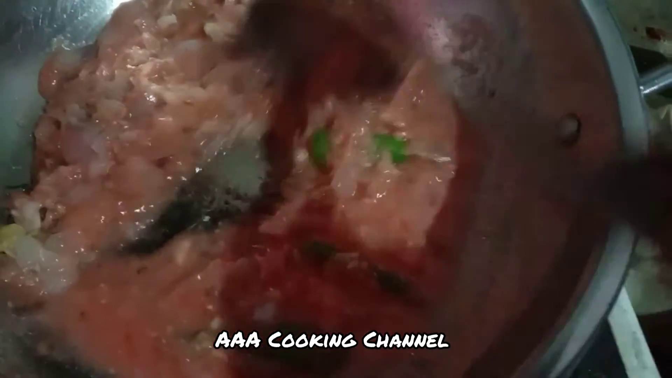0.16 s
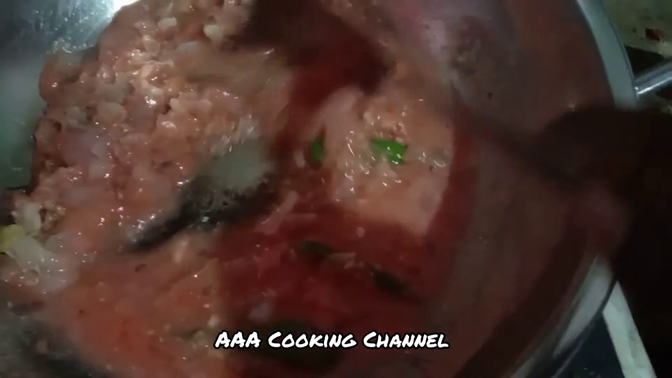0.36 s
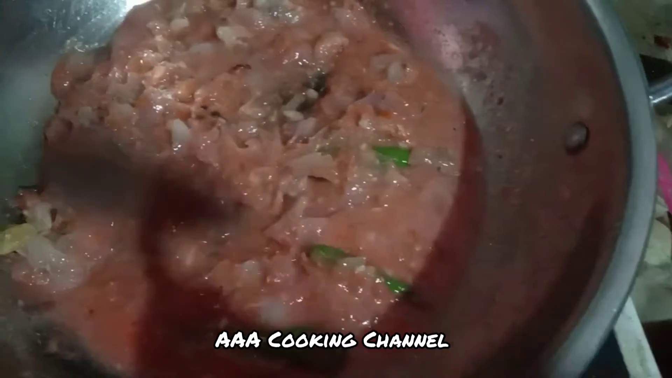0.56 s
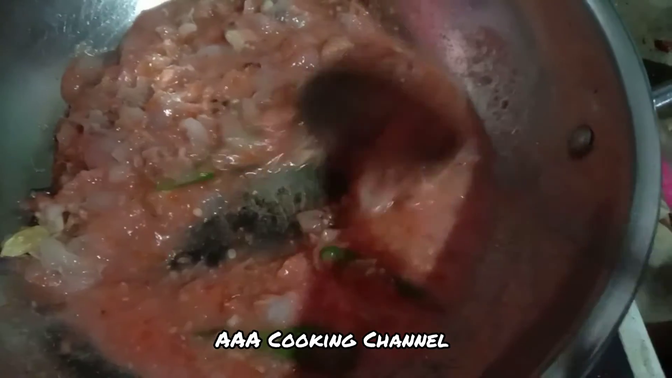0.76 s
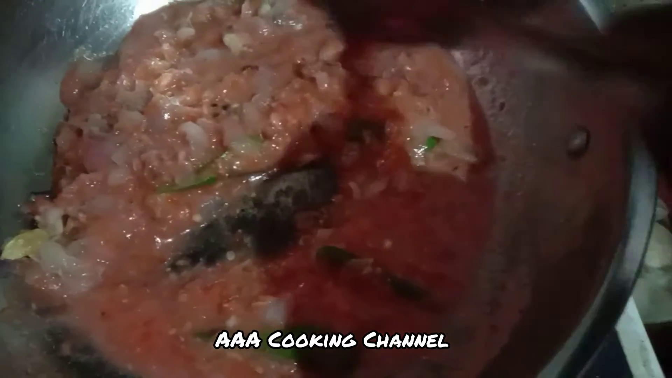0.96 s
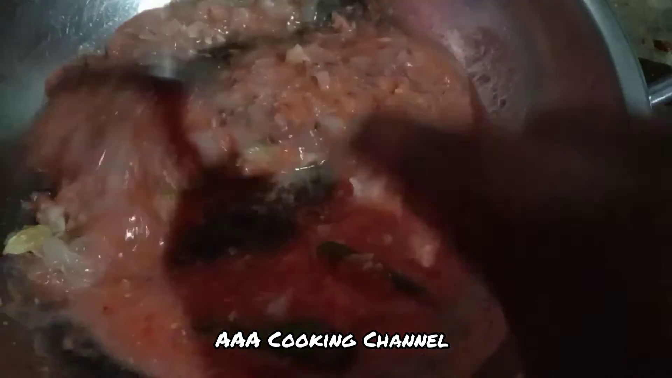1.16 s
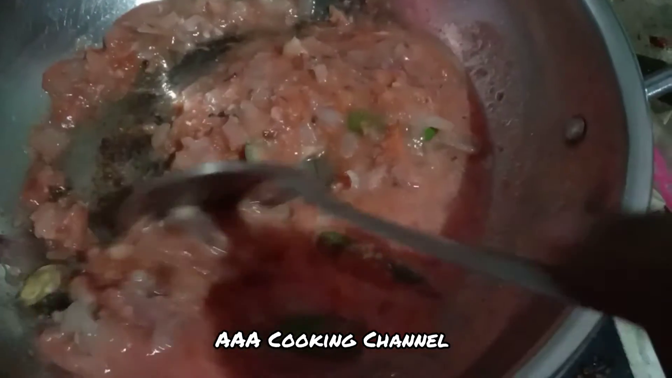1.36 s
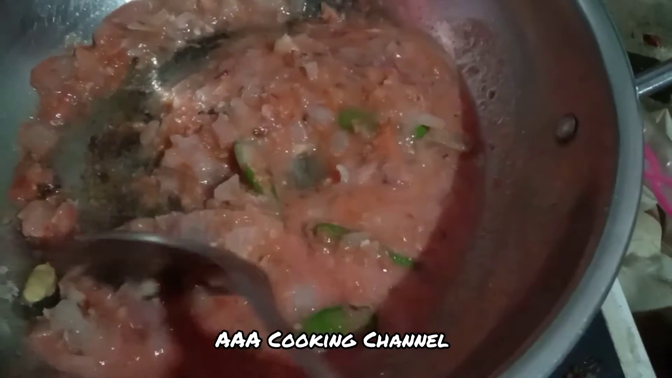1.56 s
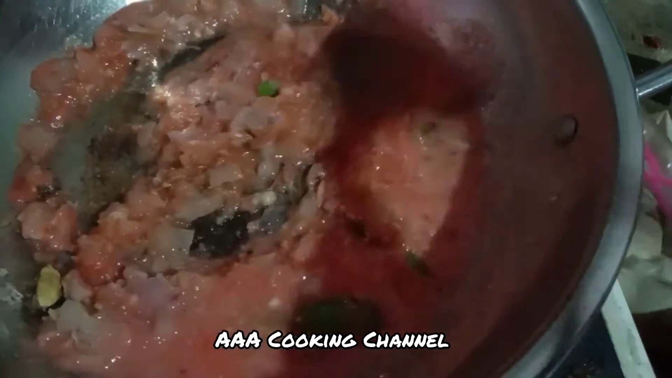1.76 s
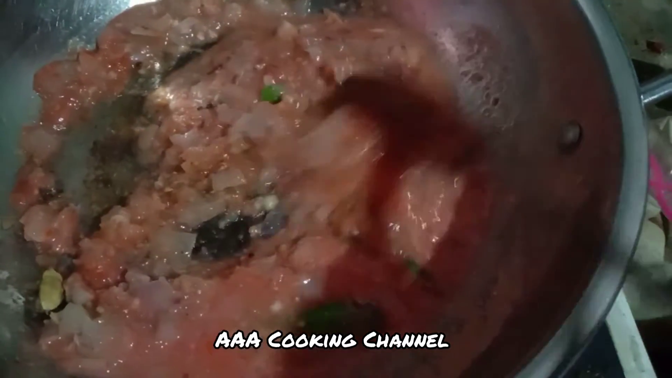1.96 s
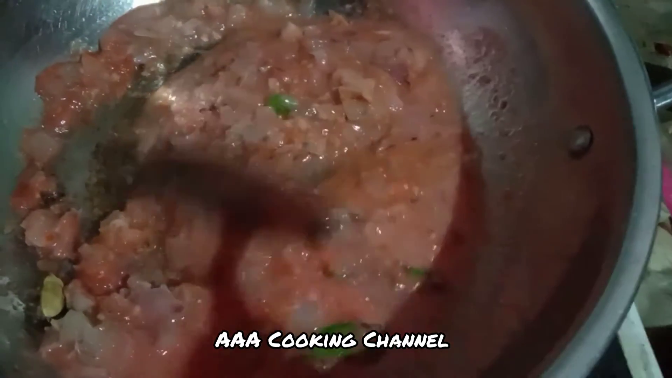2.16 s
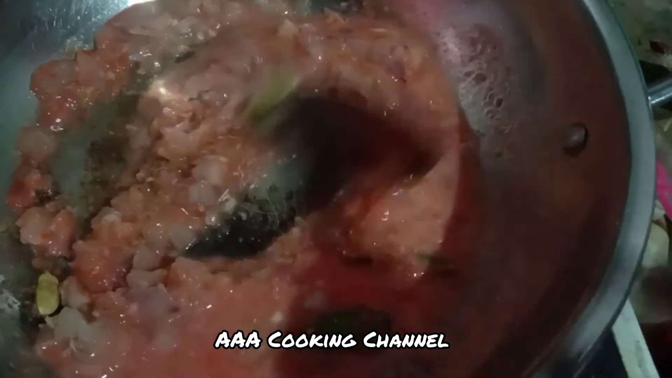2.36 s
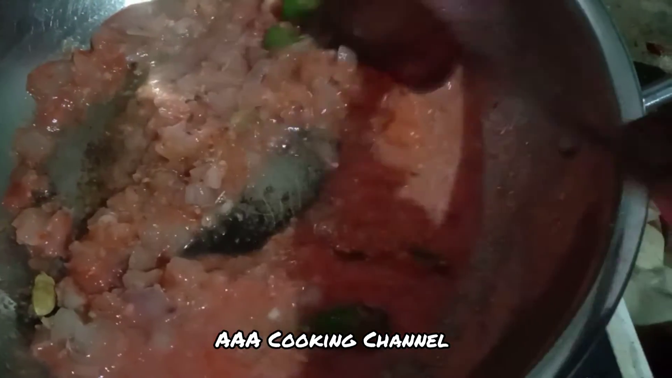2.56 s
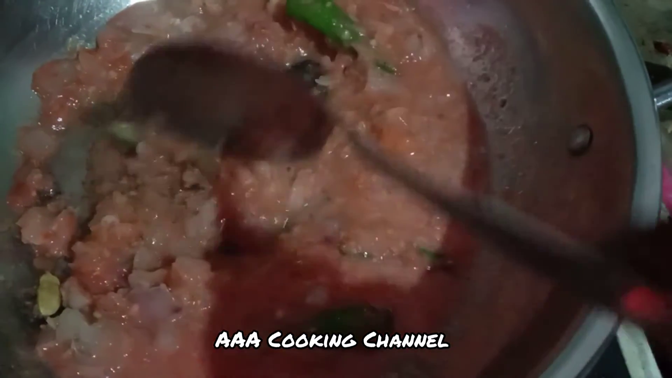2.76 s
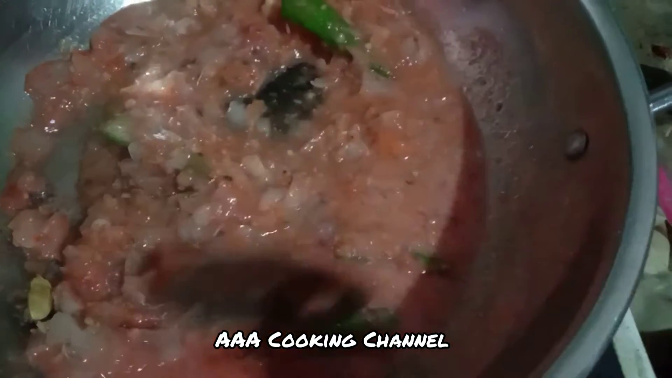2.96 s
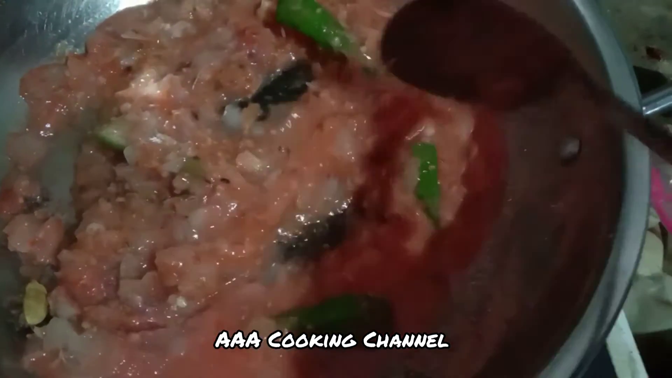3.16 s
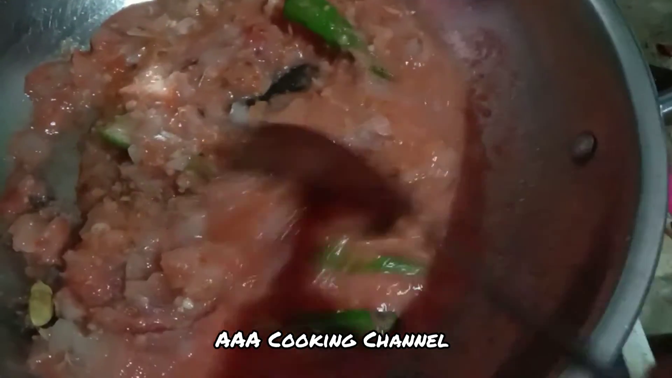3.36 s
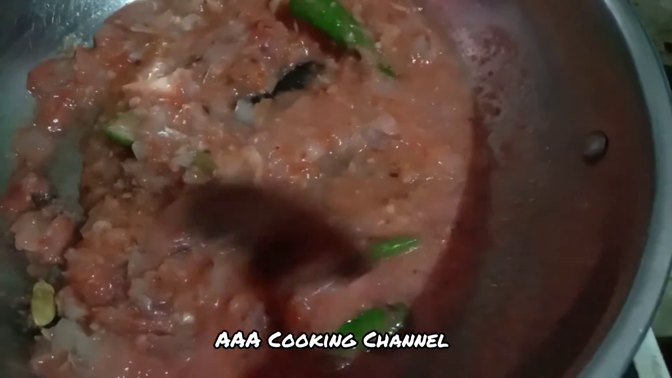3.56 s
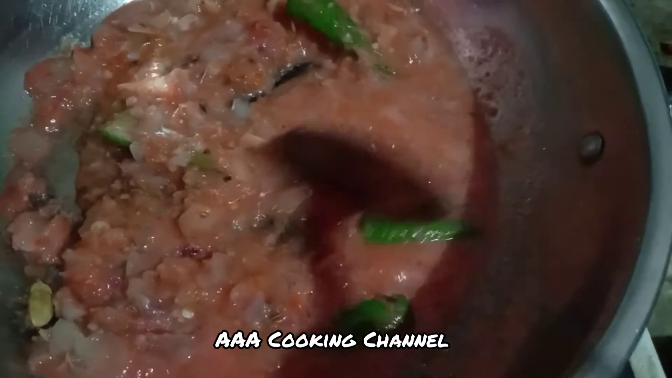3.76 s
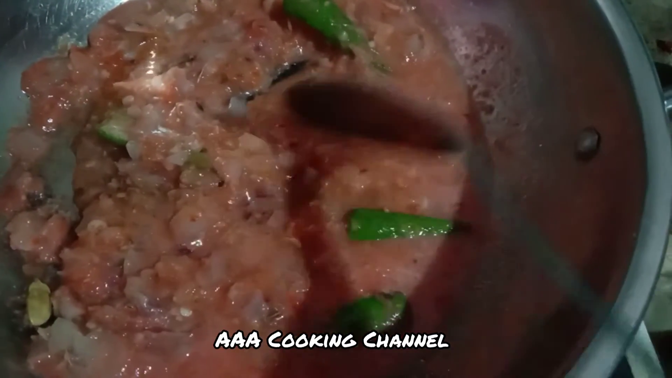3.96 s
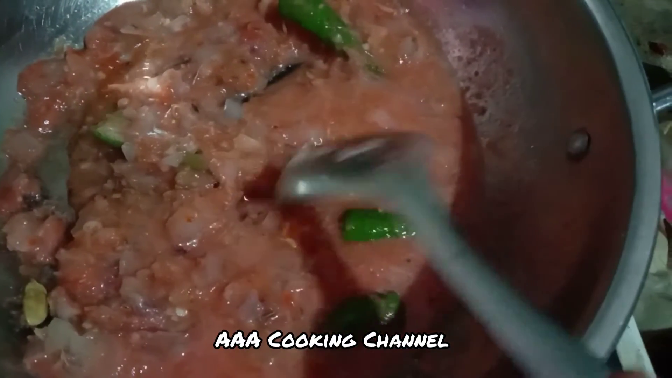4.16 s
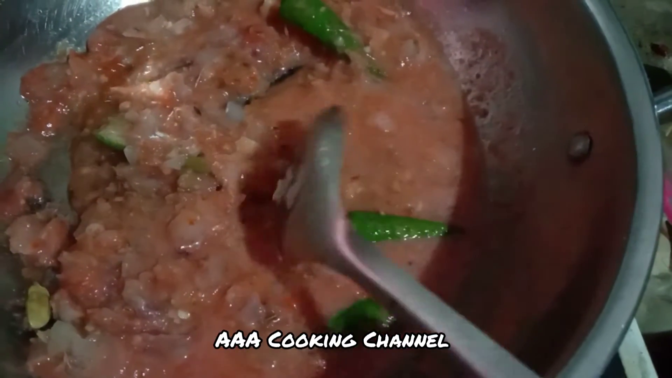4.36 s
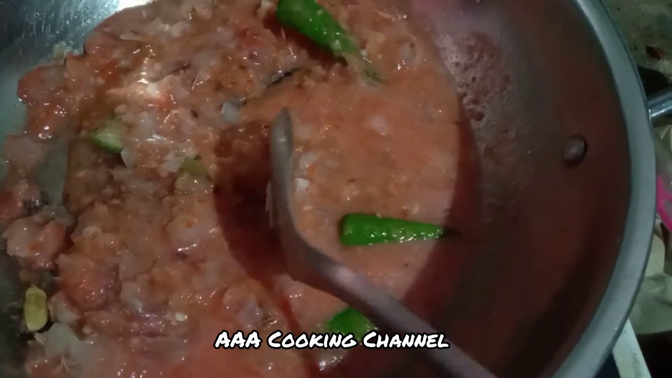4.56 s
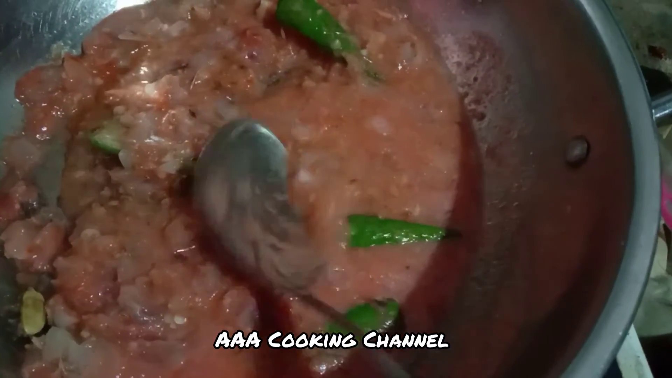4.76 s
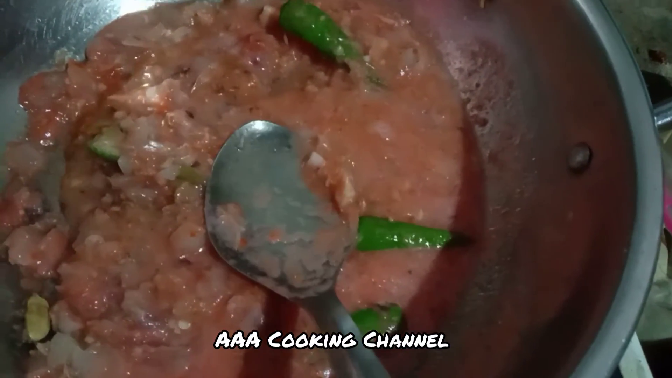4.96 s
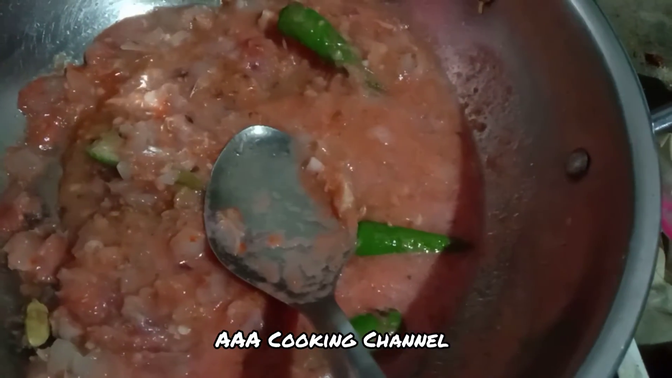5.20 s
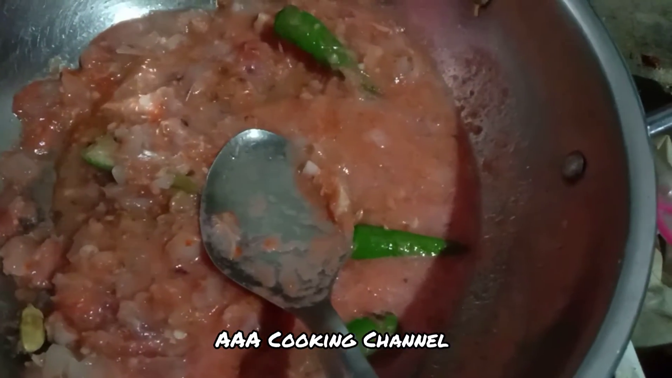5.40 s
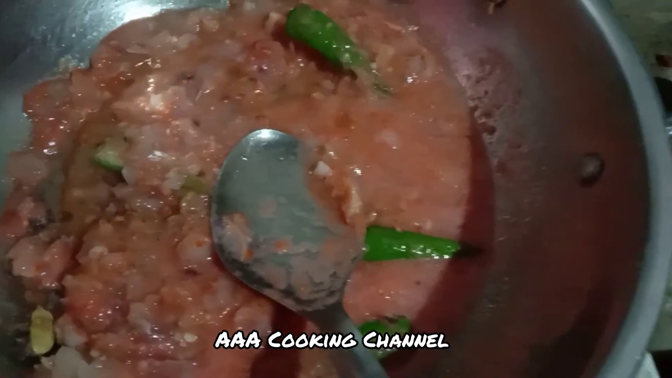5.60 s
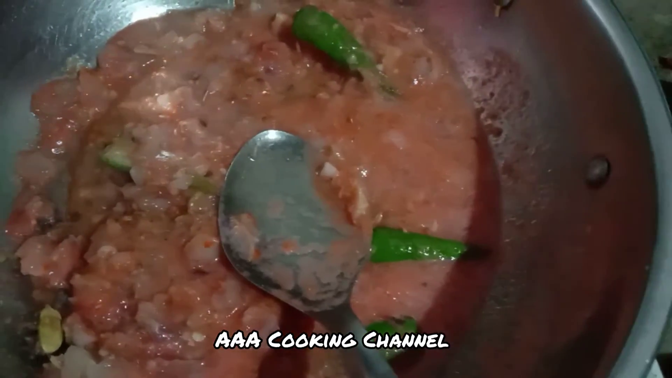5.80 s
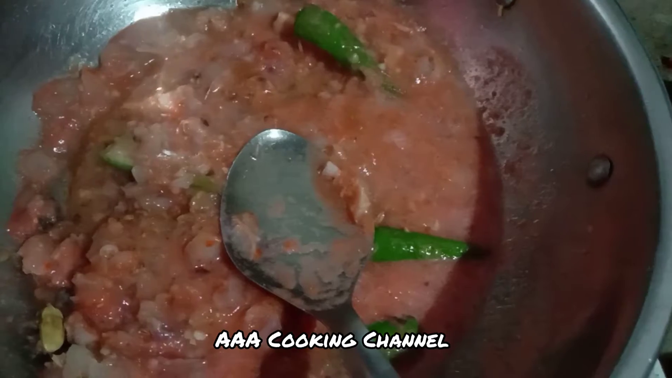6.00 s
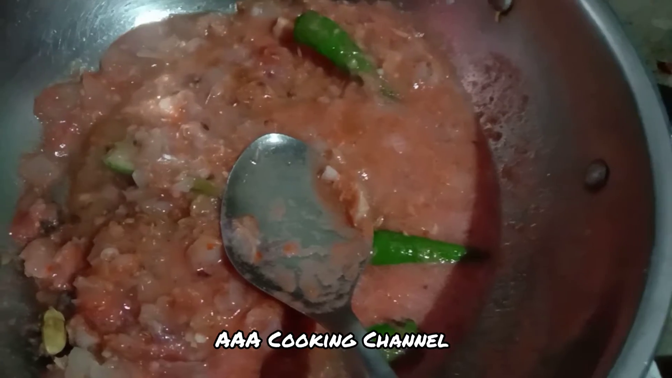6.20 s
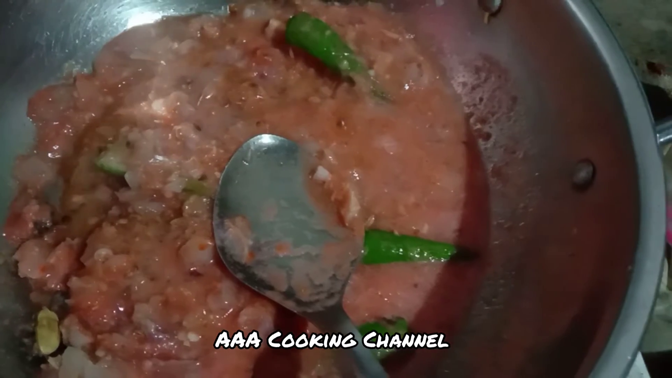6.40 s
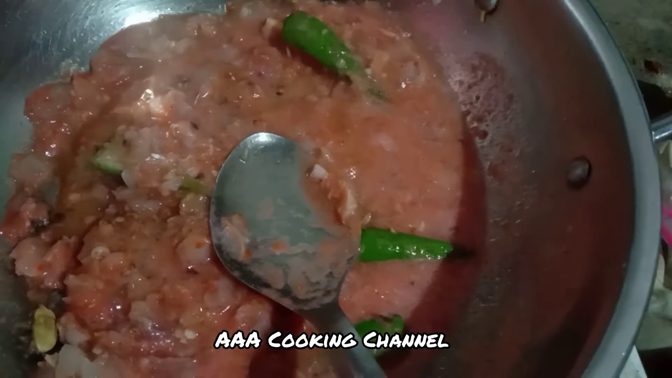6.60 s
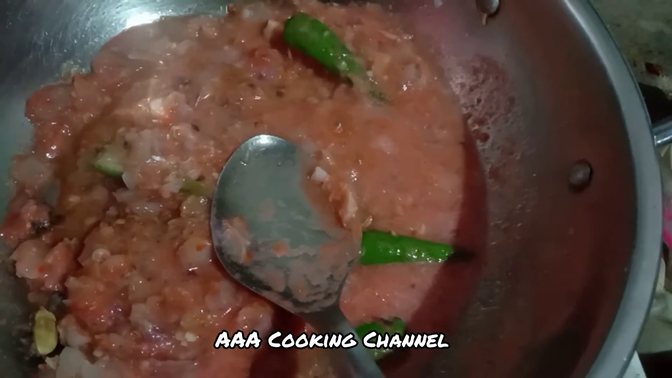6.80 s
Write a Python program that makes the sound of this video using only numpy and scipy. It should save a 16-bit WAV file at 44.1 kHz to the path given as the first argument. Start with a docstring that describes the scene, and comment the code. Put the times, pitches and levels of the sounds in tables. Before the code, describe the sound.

Close-up frying in a steel pan: low burner roar, spoon knocks, a short ringing skid, then squeaks and increasingly lively wet popping.

```python
"""In a small kitchen, onion and tomato masala fries in a steel pan, heard from close above.
The gas flame is shaped noise; the hissing, sputtering paste is thousands of tiny random bursts plus bigger pops.
A spoon clicks and knocks (fading pan tones and noise), scrapes and squeaks, and once skids and rings.
Wet paste pushed onto bare steel hisses evenly; as the paste settles, steam sputters in little bursts.
Oil specks tick and steam flashes briefly; the pan's sides and the room add reflections."""
import sys
import numpy as np
from scipy import signal
from scipy.fft import rfft, irfft, next_fast_len
from scipy.io import wavfile
from scipy.ndimage import map_coordinates

SR = 44100
rng = np.random.default_rng(int(sys.argv[2]) if len(sys.argv) > 2 else 0)


def master(y):
    """Save y as 16-bit WAV."""
    cut = np.clip(np.atleast_2d(y).T, -1, 1)
    pcm = np.round(cut * 32767)  # scale
    wavfile.write(sys.argv[1], SR, pcm.astype(np.int16))


N = 301644  # length in samples


def amp(db):
    """Turn decibels into gain."""
    return 10 ** (np.asarray(db) / 20)


def unit(x):
    """Scale to an rms of 1."""
    return x / np.sqrt(np.mean(x ** 2) + 1e-20)


def along(points, hz):
    """Read a curve of (Hz, value) points on a log frequency axis."""
    f, v = np.transpose(points)
    return np.interp(np.log(hz + 1), np.log(f + 1), v)


def wobble(rate):
    """A smooth random curve with this many random points per second."""
    knots = rng.standard_normal(int(N * rate / SR) + 4)
    return map_coordinates(knots, [np.arange(N) * rate / SR])


def bumps(rows):
    """Smooth rises and falls from rows of (time s, height, half length s)."""
    t = np.arange(N) / SR
    return sum(height * np.exp(-.5 * ((t - s) / length) ** 2) for s, height, length in rows)


def filtered(x, response):
    """Multiply the spectrum of x by a response, a function of frequency."""
    n = x.shape[-1]
    padded = 2 * next_fast_len(n // 2 + 4096)
    hz = np.fft.rfftfreq(padded, 1 / SR)
    return irfft(rfft(x, padded) * response(hz), padded)[..., :n]


def causal(gain):
    """The minimum-phase response with this gain: it acts as early as possible, never before the sound."""
    cepstrum = irfft(np.log(np.maximum(gain, 1e-6)))
    half = len(cepstrum) // 2
    return np.exp(rfft(np.r_[cepstrum[0], 2 * cepstrum[1:half], np.zeros(half)]))


def coloured(x, points):
    """Give x a tone colour with a causal filter that keeps the power of white noise."""
    return filtered(x, lambda hz: causal(unit(amp(along(points, hz)))))


def peaks(rows, hz):
    """Power gain of resonances, from rows of (centre Hz, width Hz, peak dB)."""
    total = 0
    for centre, width, db in rows:
        damping = (hz * width) ** 2
        total = total + amp(db) ** 2 * damping / ((centre * centre - hz * hz) ** 2 + damping)
    return total


def fade(t, t60):
    """Free decay, falling 60 dB in t60 seconds."""
    return np.exp(-np.log(1000) * t / t60)


def add(track, s, sound):
    """Mix a sound into the track at time s, in seconds."""
    room = track[round(s * SR):][:len(sound)]
    room += sound[:len(room)]


def flame():
    """Gas roars under the pan, whose hollows colour it, over a low uneven rumble."""
    # colour of the roar and of the thin hiss of its jets: hz, relative_db per Hz
    roar_colour = [(25, -38), (120, -40), (190, -18), (250, 1.5), (370, 1), (460, -21.5), (1050, -10.5),
                   (1500, -19), (2100, -20), (2350, -41), (3400, -39), (5200, -30), (6000, -24),
                   (7500, -18.5), (8800, -30), (11000, -43.5), (16000, -56)]
    # the hollow of the pan and the gap beneath it: centre_hz, width_hz, relative_db
    hollows = [(277, 68, 0.5), (583, 72, -8.5), (736, 62, -2), (970, 5.9, -3), (1239.5, 64.4, 2),
               (2033, 48, -9), (2500, 31, -21.5), (2944, 34, -14), (4370, 570, -17)]
    # colour of the rumble: hz, relative_db per Hz
    rumble_colour = [(20, -31), (45, -20.5), (85, 0), (120, 0.5), (180, -3), (300, -11.5), (800, -47)]
    # soft swells of the bright edge and the rumble: middle_s, bright_level_db, rumble_level_db, half_length_s
    swells = [(0.686, -57, -53, 0.037), (1.16, -50, -57, 0.053), (2.37, -53.5, -55, 0.1),
              (2.89, -52, -55, 0.059), (3.577, -49.5, -70, 0.13), (3.752, -71, -48.5, 0.036),
              (4.235, -49.5, -49, 0.1), (4.613, -63, -51, 0.025), (6.016, -48, -70, 0.069)]
    # brief dips of the roar: middle_s, depth_db, half_length_s
    dips = [(1.852, 9, .025), (4.029, 7, .01)]
    roar_db, rumble_db = -41.5, -60.5
    start_softer_db, fill_out_s = 0.5, 0.96  # the roar starts a little softer and fills out

    def roar_gain(hz):
        hollow_power = peaks(hollows, hz) / (1 + (hz / 5500) ** 8)
        return np.sqrt(amp(along(roar_colour, hz)) ** 2 + hollow_power)

    roar = filtered(rng.standard_normal(N), roar_gain)
    rumble = filtered(rng.standard_normal(N), lambda hz: amp(along(rumble_colour, hz)))
    bright = filtered(rng.standard_normal(N), lambda hz: np.exp(-((hz - 1770) / 380) ** 2))
    bright_swell = bumps([(s, amp(db), length) for s, db, _, length in swells])
    rumble_swell = bumps([(s, amp(db), length) for s, _, db, length in swells])
    soft_db = start_softer_db * np.exp(-np.arange(N) / SR / fill_out_s)
    waver_db = 1.2 * wobble(14) + 0.69 * wobble(2.865)
    roar_gain_over_time = amp(roar_db - soft_db + waver_db - bumps(dips))
    rumble_gain = np.hypot(amp(rumble_db + 2.5 * wobble(8.1)), rumble_swell)
    return roar_gain_over_time * unit(roar) + rumble_gain * unit(rumble) + bright_swell * unit(bright)


def bubbles(rate, spread_db):
    """Random single-sample bursts of uneven size, on average rate per second, scaled to rms 1."""
    sizes = np.clip(rng.standard_normal(N), -2, 2)
    born = rng.random(N) < rate / SR
    signs = np.sign(rng.standard_normal(N))
    return unit(born * signs * amp(spread_db * sizes))


def hiss_level():
    """Gain of the fine hiss: the simmer flutters and grows; each wetting rises, holds and dies."""
    # wet paste spreads onto bare steel: start_s, hold_s, level_db
    wettings = [(1.087, 1.52, -49.5), (1.813, 0.83, -48), (4.458, 0.17, -41.5), (5.95, 0.62, -58)]
    start_db, growth_db_per_s, flutter_db = -67.5, 2.03, 3  # it grows as the paste heats
    attack_s, release_s = 0.088, 0.14
    t = np.arange(N) / SR
    power = amp(start_db + growth_db_per_s * t + flutter_db * wobble(35)) ** 2
    for s, hold, db in wettings:
        attack = 1 - np.exp(-np.maximum(t - s, 0) / attack_s)
        release = np.exp(-np.maximum(t - s - hold, 0) / release_s)
        power += (amp(db) * attack * release) ** 2
    return np.sqrt(power)


def sputter_level(s):
    """The sputter in dB at time s: it grows as the paste settles and traps steam."""
    wet_db, settled_db = -68, -47.5  # freshly stirred paste, settled paste
    middle_s, change_s = 2.36, 0.51  # middle and time scale of the change
    settled = 1 / (1 + np.exp((middle_s - s) / change_s))
    return wet_db + (settled_db - wet_db) * settled


def sputter():
    """Steam pockets of several sizes break at random, each with a sharp spit and a spray of crackles."""
    # resonances of the pocket sizes: centre_hz, width_hz, relative_db
    cavities = [(3800, 2000, 1), (5740, 420, -0.5), (7060, 5800, -1.5), (10900, 2000, 7)]
    out, t = np.zeros(N), np.arange(SR // 8) / SR
    shape = fade(t, 0.006) + amp(-10) * fade(t, 0.045)  # spit, then spray
    for pitch, width, db in cavities:
        pockets = np.abs(bubbles(rate=80, spread_db=1.8))
        crackle = signal.fftconvolve(pockets, shape)[:N] * bubbles(rate=8300, spread_db=0)
        pocket_row = [(pitch, width, 0)]
        resonant = filtered(crackle, lambda hz: causal(0.31 + np.sqrt(peaks(pocket_row, hz))))
        out += amp(db) * unit(resonant)
    # the steam escapes in surges
    return unit(out * amp(1.9 * wobble(22)))


def lesser_pops(count=70):
    """Bubbles bursting at random, as strong as the sputter allows: rows of start_s, level_db, pitch_hz."""
    over_sputter_db, scatter_db = 16, 3
    middle_hz, scatter_octaves = 6400, 0.17
    times = rng.random(count) * N / SR
    size, pitch = rng.standard_normal((count, 2)).T
    levels_db = sputter_level(times) + over_sputter_db + scatter_db * size
    return zip(times, levels_db, middle_hz * 2 ** (scatter_octaves * pitch))


def frying():
    """Tiny bubbles hiss under the sputter; large ones snap, spit, crackle and spray."""
    # the loudest bubbles: start_s, level_db (before the shared colour), pitch_hz
    loud_pops = [(0.3496, -32, 7450), (0.4863, -27.5, 6900), (2.765, -24, 6500), (2.925, -23.5, 7150),
                 (2.9304, -26, 7590), (3.012, -29, 7560), (3.0272, -20.5, 7660), (3.1708, -29, 7050),
                 (3.2191, -21, 4530), (3.23, -27, 5800), (3.3564, -22, 5770), (3.3662, -22.5, 5800),
                 (3.5783, -30, 5740), (3.594, -28, 5000), (3.661, -25, 7200), (3.7938, -38, 5900),
                 (3.802, -23, 7710), (3.8392, -26, 7000), (4.117, -20, 7670), (4.3222, -22, 4680),
                 (4.3345, -25, 5460), (4.7795, -25, 7360), (4.7885, -24, 5800), (4.804, -25, 7580),
                 (4.922, -19, 5870), (4.9467, -23, 5920), (4.9835, -39, 5900), (5.0382, -23, 7220),
                 (5.0616, -19, 6240), (5.068, -21.5, 8300), (5.072, -25, 7000), (5.139, -27, 6000),
                 (5.1725, -25, 7300), (5.182, -23.5, 7300), (5.186, -22, 5890), (5.2215, -29, 5700),
                 (5.2345, -20.5, 4300), (5.3258, -22, 5890), (5.337, -25, 6200), (5.382, -22, 6320),
                 (5.4015, -25.5, 5930), (5.414, -26, 6200), (5.449, -26, 7060), (5.5392, -25, 5800),
                 (5.588, -25, 4940), (5.622, -25, 7100), (5.6425, -23, 5940), (5.6865, -23, 6400),
                 (5.7925, -22, 5970), (5.802, -25, 7200), (5.8445, -24.5, 4330), (6.0187, -26, 5860),
                 (6.11, -26, 7310), (6.127, -23, 5810), (6.177, -24, 5840), (6.3305, -21, 7770),
                 (6.3855, -26, 5870), (6.417, -25.5, 5890), (6.4752, -29, 5670), (6.4804, -24, 5760),
                 (6.5151, -30, 7470), (6.706, -25.5, 6000), (6.7695, -25, 7250)]
    # colour of bursting bubbles: hz, relative_db per Hz
    fizz_colour = [(700, -42), (2000, -12.5), (2700, -10.5), (3050, -4), (3300, -2.5), (4500, 1.5),
                   (5200, 2), (5900, 4), (7000, 2), (7750, 3), (9000, -6.5), (10500, -17), (12200, -26.5),
                   (16000, -27.5)]
    t = np.arange(SR // 8) / SR
    hiss = hiss_level() * bubbles(rate=14000, spread_db=6.0)
    fat = hiss + amp(sputter_level(np.arange(N) / SR)) * sputter()
    for s, db, pitch in [*loud_pops, *lesser_pops()]:
        spit = amp(-7.5) * fade(t, .005) * np.sign(rng.standard_normal(len(t)))
        snap_and_spit = np.where(t == 0, amp(2), spit)
        crackle_and_spray = amp(-21) * fade(t, 0.025) + amp(-27) * fade(t, 0.12)
        burst = snap_and_spit + crackle_and_spray * rng.standard_normal(len(t))
        # each bubble favours its own pitch
        pitch_row = [(pitch, 2200, 0)]
        add(fat, s, amp(db) * filtered(burst, lambda hz: causal(.5 + peaks(pitch_row, hz))))
    return coloured(fat, fizz_colour)


def scrapes():
    """The edge slips over steel in dense grains; on dry steel narrow squeals catch and let go in turn."""
    # strokes of the spoon: hardest_s, level_db, rise_s, fall_s, squeal share (0-1)
    strokes = [(0.011, -42, .008, 0.0068, 0), (0.9873, -22.5, 0.002, 0.0017, 0.25),
               (0.9893, -19, 0.00033, 0.0006, 0.04), (1.1138, -30.5, 0.0006, 0.0035, 0),
               (1.1181, -31.5, .0006, 0.0026, 0), (1.141, -39, 0.0005, 0.002, .05),
               (1.194, -34, 0.009, 0.0065, 0), (1.209, -32, 0.002, 0.0025, 0.2),
               (4.692, -39, .005, .009, .7), (4.717, -38, 0.008, .016, 0.5),
               (4.74, -32.5, 0.009, 0.009, 0.3), (4.762, -35, 0.005, 0.017, 0.05)]
    # squeal of the rubbing edge: pitch_hz, width_hz, relative_db
    squeal_tones = [(2650, 150, -10), (3150, 150, -11), (4270, 210, 0), (5700, 200, -3), (7350, 220, -2),
                    (7800, 200, 1), (9700, 250, -15), (10550, 250, -12), (11750, 240, -13),
                    (14800, 350, -23)]
    # colour of the edge dragged over steel: hz, relative_db per Hz
    rasp_colour = [(300, -20), (1500, -2.5), (2500, -7.5), (4400, -2), (6200, 3.5), (7400, 3), (8700, -3.5),
                   (10300, -14), (12000, -25), (16000, -33)]
    out, t = np.zeros(N), np.arange(N) / SR
    grains = coloured(bubbles(rate=6000, spread_db=2.5), rasp_colour)
    grit = unit(grains * amp(2 * wobble(450)))
    squeal = np.zeros(N)
    for hz, width, db in squeal_tones:
        pitch = hz + .4 * width * wobble(300)
        squeal += amp(db + 4 * wobble(110)) * np.sin(2 * np.pi * np.cumsum(pitch) / SR)
    squeal = unit(squeal)
    for s, db, rise, fall, share in strokes:
        pressure = np.exp(-np.maximum((s - t) / rise, (t - s) / fall))
        out += amp(db) * pressure * (np.sqrt(1 - share) * grit + np.sqrt(share) * squeal)
    return out


def specks():
    """Specks of oil burst on the steel with thin, bright ticks; fainter ones come at random."""
    # ticks while the pan is still quiet: start_s, level_db (before the bright filter)
    loud_specks = [(.0515, -32), (.1445, -37), (.2245, -40), (.307, -38), (.3245, -35), (.351, -33),
                   (.7065, -46), (.758, -38), (.8045, -40)]
    ticks = amp(-78) * bubbles(rate=14, spread_db=2)
    for s, db in loud_specks:
        add(ticks, s, amp([db]))  # a single sample
    return filtered(ticks, lambda hz: causal(unit(peaks([(8800, 3500, 0)], hz) ** .8)))


def flashes():
    """Paste flicked onto dry steel flashes off in a brief bright hiss."""
    # flashes of steam: middle_s, level_db, half_length_s
    steam = [(0.342, -55, .025), (1.898, -45, 0.021)]
    centre_hz, width_hz = 7900, 900
    grains = bubbles(rate=6000, spread_db=4)
    hiss = filtered(grains, lambda hz: np.exp(-.5 * ((hz - centre_hz) / width_hz) ** 2))
    return unit(hiss) * bumps([(s, amp(db), length) for s, db, length in steam])


def ring(modes, t, scatter_db):
    """A struck object rings in fading tones, at new random strengths for each blow."""
    out = 0
    for hz, db, t60 in modes:
        strength = amp(db + scatter_db * rng.normal())
        out = out + strength * fade(t, t60) * np.sin(2 * np.pi * (hz * t + rng.random()))
    return out


def clicks():
    """The spoon's edge strikes the pan: a sharp touch, a short gritty contact and the pan's damped ring."""
    # strikes: start_s, level_db, tilt in dB per octave, contact_t60_s, treble_top_hz,
    # spot_hz (resonance of the struck spot), spot_lift_db
    strikes = [(0.6026, -18.5, -3, 0.035, 16000, 2670, 1.5), (0.6146, -34, 1, .02, 12000, 7360, 5),
               (0.986, -20.5, -4.5, 0.016, 17000, 3100, 6.5), (1.8346, -19, 5, 0.021, 11100, 7800, 7),
               (4.0401, -12.5, -2, 0.018, 9800, 4150, 0.5), (4.053, -30, -1, .01, 9800, 4150, 2)]
    # tones of the pan, damped by the paste: pitch_hz, relative_db, t60_s
    pan_tones = [(375, -14, .06), (650, -10, .025), (1240, -6.5, .026), (1820, -9, .012), (2350, -13, .015),
                 (3070, -5, .012), (3160, -28, .11), (4200, -3, .014), (5900, -5, .013), (7220, 1, .03),
                 (7640, 1.5, .03), (8490, -5, .034), (14800, -24, .03)]
    # colour of steel on steel: hz, relative_db per Hz
    grit_colour = [(150, -40), (350, -18), (1400, -1), (2400, -2.5), (3200, 3), (3650, -2.5), (4400, 8),
                   (5000, -3.5), (6000, 8), (7700, 4), (9000, -2), (10500, -13), (13000, -17), (16000, -19)]
    out, t = np.zeros(N), np.arange(SR // 5) / SR
    for s, db, tilt_db, t60, top_hz, spot_hz, spot_db in strikes:
        def spot_and_low_cut(hz):
            lift = amp(spot_db * peaks([(spot_hz, 700, 0)], hz))
            return causal(lift) * 1j * hz / (130 + 1j * hz)

        def tilt_and_top(hz):
            tilt = amp(tilt_db * np.log2(np.clip(hz, 800, 7500) / 5000))
            return causal(tilt / np.hypot(1, (hz / top_hz) ** 4))

        grind = amp(-1) * np.sign(rng.standard_normal(len(t))) * fade(t, t60)
        contact = np.where(t == 0, amp(12), grind)  # the first touch is sharpest
        blow = coloured(contact, grit_colour) + amp(-9) * ring(pan_tones, t, scatter_db=1)
        blow = filtered(blow, spot_and_low_cut)
        add(out, s, amp(db) * filtered(blow, tilt_and_top))
    return out


def knocks():
    """A cushioned blow gives one push and a squelch, and the whole pan swings briefly on its stand."""
    # knocks through the paste: start_s, level_db, pitch_hz, t60_s, rise_s, thud_db over the level
    blows = [(.605, -32, 310, 0.077, 0.0044, -6), (1.004, -35, 358, 0.086, 0.0032, -14),
             (1.849, -22.5, 249.4, 0.21, 0.039, -42), (3.2197, -20.5, 346, 0.086, 0.0044, -1),
             (4.041, -31.5, 338, 0.18, 0.0026, -3)]
    # colour of a blow cushioned by paste: hz, relative_db per Hz
    thud_colour = [(150, -30), (330, 2), (450, 3), (600, -1), (930, -1), (1100, -15), (1280, -7),
                   (1550, -13), (1800, -25), (2300, -23), (4000, -50)]
    out, t = np.zeros(N), np.arange(SR // 4) / SR
    for s, db, hz, t60, rise, thud_db in blows:
        swing = np.sin(2 * np.pi * hz * t) * fade(t, t60) * (1 - np.exp(-t / rise))
        push = amp(20) * (t == 0)
        squelch = amp(-6) * rng.standard_normal(len(t)) * fade(t, 0.075)
        add(out, s, amp(db) * (swing + amp(thud_db) * coloured(push + squelch, thud_colour)))
    return out


def skid():
    """The chattering edge keeps the spoon's bowl ringing roughly until it lifts off."""
    # contacts as the spoon skids: start_s, level_db (lowered by the rasp setting), t60_s
    contacts = [(4.2251, -15, 0.036), (4.2257, -14, 0.013), (4.2382, -16, 0.023), (4.2468, -23.5, 0.049),
                (4.256, -25, .025), (4.263, -18.5, 0.024), (4.275, -30, 0.03), (4.2855, -32, 0.016)]
    # tones of the spoon's bowl: pitch_hz, level_db, delay_s after the first contact, hold_s, t60_s
    bowl_tones = [(3932, -22.8, 0, .036, .1), (3940, -37.5, 0, .04, .22), (6790, -19.5, 0, .007, .03),
                  (7100, -21, 0, .002, .04), (7710, -26.5, 0, .02, .12), (7822, -31, .012, .027, .08),
                  (6415, -34, .012, .02, .13), (6180, -34, .012, .015, .12), (4414, -38, 0, .015, .13),
                  (3230, -44, 0, .015, .11)]
    # spoon and pan pressed together: centre_hz, width_hz, relative_db
    chatter = [(1270, 110, -8), (1750, 150, -11.5), (2460, 120, -12.5), (3170, 100, -14), (4440, 220, -12),
               (4820, 83, -8), (5430, 110, -7), (6200, 340, -6), (6830, 280, -1), (7770, 240, 0.5),
               (8350, 200, -13), (9000, 120, -12), (14850, 350, -27)]
    rise_cycles, jitter_hz, rough_db, rough_t60_s, rasp_db = 8, 34, 2.3, .5, -2.7
    out, t = np.zeros(N), np.arange(SR // 3) / SR
    for hz, db, delay, hold, t60 in bowl_tones:
        rise = 1 - np.exp(-t * hz / rise_cycles)
        calming = fade(t, rough_t60_s)
        rough = wobble(230)[:len(t)] * calming
        pitch = hz + jitter_hz * wobble(390)[:len(t)] * calming
        level = amp(db + rough_db * rough) * rise * fade(np.maximum(t - hold, 0), t60)
        add(out, contacts[0][0] + delay, level * np.sin(2 * np.pi * np.cumsum(pitch) / SR))
    for s, db, t60 in contacts:
        noise = rng.standard_normal(len(t)) * fade(t, t60)
        contact = amp(db + rasp_db) * noise * amp(2 * wobble(800)[:len(t)])
        add(out, s, filtered(contact, lambda hz: causal(unit(peaks(chatter, hz) ** .65))))
    return out


def squeaks():
    """As the spoon is laid down its edge sticks and slips, in short squeaks of unsteady, gliding pitch."""
    # squeaks and groans: middle_s, level_db, half_length_s, pitch_hz, glide in Hz per second
    squeak_rows = [(4.693, -36, .004, 7800, 0), (4.718, -38, .012, 7850, -3000),
                   (4.719, -34, .005, 4250, 8000), (4.741, -36, .004, 4300, 0), (4.733, -56, .01, 14800, 0),
                   (4.743, -32, .004, 6020, 0), (4.743, -33, .0035, 7420, -9000),
                   (4.755, -35, .006, 1450, -16000)]
    out, t = np.zeros(N), np.arange(-SR // 16, SR // 16) / SR
    for s, db, length, hz, glide in squeak_rows:
        pitch = (hz + glide * t) * (1 + 0.015 * wobble(504)[:len(t)])
        grip = np.exp(-.5 * (t / length) ** 2) * amp(3 * wobble(250)[:len(t)])
        add(out, s + t[0], amp(db) * grip * np.sin(2 * np.pi * np.cumsum(pitch) / SR))
    return out


def notched(x):
    """On the way up from the pan's floor one narrow band partly cancels."""
    notch_hz, notch_db, width_hz = 6590, -10, 150
    return filtered(x, lambda hz: causal(amp(notch_db * np.exp(-((hz - notch_hz) / width_hz) ** 2))))


def pan_walls(x):
    """The pan's sides reflect what happens inside it, adding delayed weaker copies."""
    # reflections: delay_s, gain (no unit)
    walls = [(.00068, 0.033), (.00142, 0.0052), (.0031, .13)]
    return filtered(x, lambda hz: 1 + sum(gain * np.exp(-2j * np.pi * hz * delay) for delay, gain in walls))


def kitchen(x):
    """The room adds one clear echo off the ceiling and a short weak tail."""
    # how long the tail takes to fade: hz, t60_s
    tail_fading = [(200, 0.64), (2000, 0.34), (10000, 0.14)]
    echo_s, echo_db, tail_db = .0127, -15, -15
    hz, t, z = signal.stft(rng.standard_normal(SR // 3), SR, nperseg=256)
    tail = signal.istft(z * fade(t, along(tail_fading, hz)[:, None]), SR, nperseg=256)[1]
    echo = filtered(x, lambda f: np.exp(-2j * np.pi * f * echo_s))
    reverb = signal.fftconvolve(x, tail / np.linalg.norm(tail))[:N]
    return x + amp(echo_db) * echo + amp(tail_db) * reverb


def sideways(x, width):
    """A random phase pattern makes left and right differ; width sets the gain by frequency."""
    signs = np.sign(rng.standard_normal(60))
    knots_hz = np.linspace(0, SR / 2, len(signs))
    return filtered(x, lambda hz: 1j * unit(np.interp(hz, knots_hz, signs)) * width(hz))


def stereo_side(mid):
    """What makes left and right differ: a little width, more after 4.93 s, and brief treble spreads."""
    # steady width: hz, side_minus_mid_db
    steady_width = [(30, -25), (300, -47.5), (1300, -58), (3800, -38), (6000, -61), (9000, -54),
                    (15000, -27)]
    # width added late, after 4.93 s: hz, side_minus_mid_db
    late_width = [(200, -40), (2400, -59), (5000, -56), (8000, -45), (11000, -2), (15000, -6)]
    # brief spreads of the treble: middle_s, side_minus_mid_db, half_length_s
    spreads = [(0.358, -7, 0.015), (0.991, 1.5, 0.009), (3.928, -7, 0.026), (4.95, -7, 0.011),
               (5.76, -5, 0.032), (6.588, -6, 0.014)]
    widen_at_s, widen_s, spread_from_hz = 4.93, .03, 5100  # lower sounds do not join the spreads
    opening = .5 + .5 * np.tanh((np.arange(N) / SR - widen_at_s) / widen_s)
    spread = bumps([(s, amp(db), length) for s, db, length in spreads])
    side = sideways(mid, lambda hz: amp(along(steady_width, hz)))
    side += opening * sideways(mid, lambda hz: amp(along(late_width, hz)))
    return side + spread * sideways(mid, lambda hz: 1 - 1 / (1 + (hz / spread_from_hz) ** 10))


def scene():
    """Flame below, paste and spoon inside the pan, then the room; the sound is nearly mono."""
    inside = notched(frying() + skid()) + specks() + flashes()
    inside += clicks() + knocks() + scrapes() + squeaks()
    mid = notched(flame()) + kitchen(pan_walls(inside))
    side = stereo_side(mid)
    return np.array([mid + side, mid - side])


def record(dry):
    """The microphone's housing resonates just under a steep upper band limit."""
    port_hz, port_db, width_hz, top_hz = 15200, 12, 700, 15540
    heard = filtered(dry, lambda hz: causal(amp(port_db * np.exp(-((hz - port_hz) / width_hz) ** 2))))
    return filtered(heard, lambda hz: 1 / (1 + (hz / top_hz) ** 200))


dry = scene()
out = record(dry)
master(out)
```